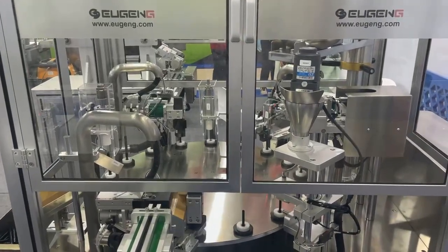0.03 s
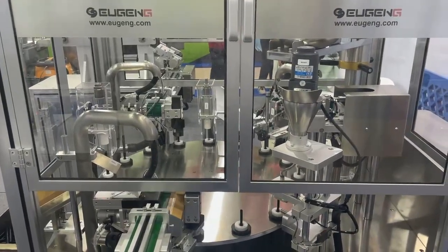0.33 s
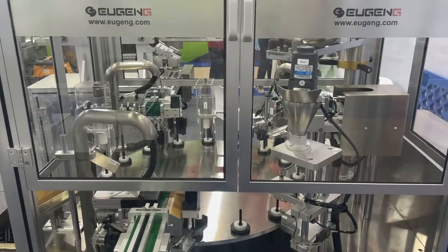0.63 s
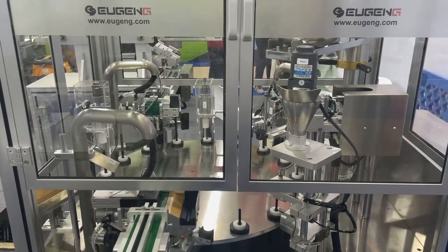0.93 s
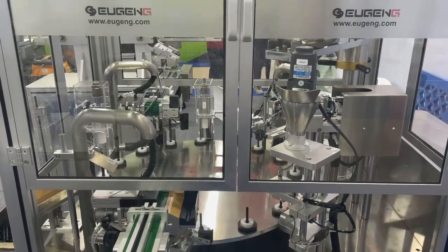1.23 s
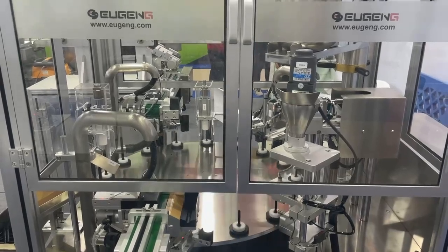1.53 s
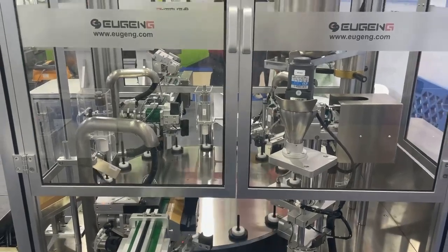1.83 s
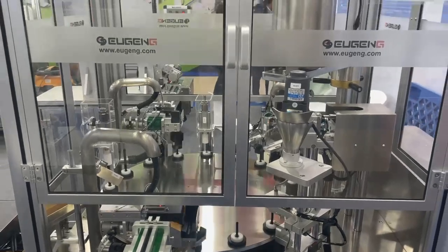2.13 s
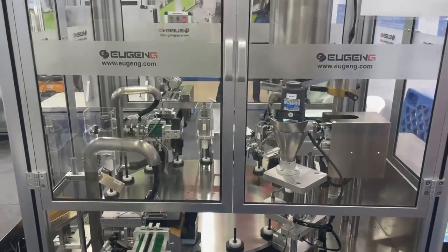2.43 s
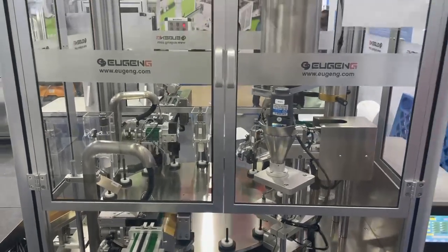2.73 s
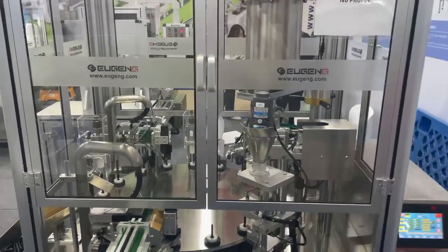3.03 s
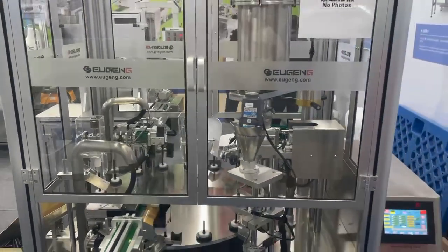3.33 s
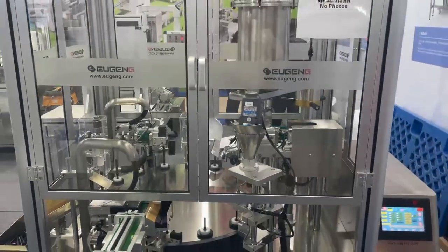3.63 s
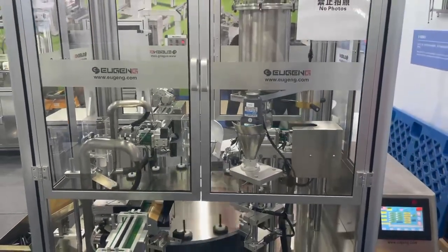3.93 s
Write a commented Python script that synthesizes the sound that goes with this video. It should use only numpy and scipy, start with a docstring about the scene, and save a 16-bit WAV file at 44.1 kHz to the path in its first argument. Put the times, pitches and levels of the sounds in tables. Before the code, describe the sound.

A filling machine runs in a large factory hall, its motors humming under irregular valve clicks, knocks and rattles. Midway, compressed air hisses and whistles briefly, then the knocking continues, with a steel ping near the end.

```python
"""Motors hum and beat over a large hall's steady roar and a faint air leak: a filling machine runs.
Pneumatic valves click and puff, slides knock against their stops, heavy strokes shake the frame,
steel parts clink and ping, loose parts rattle. The cabinet smears every blow into a short dense ring.
Midway a blast of compressed air hisses for half a second and whistles at the outlet's resonances."""
import sys
import numpy as np
from scipy import signal
from scipy.fft import rfft, irfft, next_fast_len
from scipy.io import wavfile
from scipy.ndimage import map_coordinates

SR = 44100
rng = np.random.default_rng(int(sys.argv[2]) if len(sys.argv) > 2 else 0)


def unload_audio(sound):
    """Save the sound as a 16-bit wav file, at the path given as the first command line argument."""
    columns = np.transpose(np.atleast_2d(sound))
    # keep every value between -1 and 1, then stretch to whole-number steps
    steps = np.round(np.clip(columns, -1, 1) * 32767)
    wavfile.write(sys.argv[1], SR, steps.astype(np.int16))


N = 176400

# Slide impacts. Each row: start in seconds, level in dB, t60 in seconds, tilt in dB per octave,
# note of the struck part in Hz, its level in dB.
SLIDE_HITS = [(.096, -19.5, .13, 2, 436, -20), (.235, -18.5, 0.17, -3, 810, -18),
              (.272, -16, 0.085, 1, 425, -14), (.279, -16, .1, -4.5, 350, -10.5),
              (0.283, -17, 0.11, -4, 223, -11.5), (.293, -19, .08, -3, 600, -16),
              (1.341, -19, .11, -6.5, 246, -13), (1.391, -18.5, 0.11, -1, 261, -16),
              (1.893, -15, 0.11, -2, 952, -8.5), (1.904, -18, .14, -3, 192, -9.5),
              (2.002, -15, 0.13, 1.5, 1604, -22.5), (2.226, -18.5, 0.079, 2, 407, -16),
              (2.284, -23, .08, -4, 417, -18), (2.784, -21, .05, 4, 1345, -19),
              (2.785, -22, 0.11, 2, 1920, -19), (2.803, -12, .09, -1, 499, -10.5),
              (2.824, -19.5, 0.15, -4, 307, -15), (3.01, -23.5, 0.23, 2.5, 706, -28),
              (3.284, -18, 0.055, 1, 665, -14)]
# Cabinet panels. Each row: frequency in Hz, relative density in dB.
PANEL_SPECTRUM = [(100, -39), (220, -2.5), (430, 4), (620, 1), (780, -5), (950, 2.5), (1150, -18),
                  (1500, -7.5), (2000, -11.5), (3000, -37), (8000, -67)]
# Valve clicks. Each row: start in seconds, level in dB, t60 in seconds, tilt in dB per octave.
VALVE_HITS = [(.095, -21, 0.074, -1.5), (.104, -27, .1, -2), (.293, -30, .055, 1), (.312, -31, .03, 10),
              (.792, -28.5, .044, 0), (.811, -28, .015, 7), (1.442, -18.5, 0.044, 0.5),
              (1.854, -23, 0.066, 9), (1.876, -20.5, 0.14, 12), (2.212, -25, 0.071, -6),
              (2.419, -24.5, 0.1, -8), (2.785, -21, 0.073, 1.5), (2.798, -24, .07, -2),
              (3.785, -31.5, .06, -1)]
# Metal contact noise. Each row: frequency in Hz, relative density in dB.
CONTACT_SPECTRUM = [(600, -25), (1400, 1), (2100, -8), (2800, 0), (3600, 3.5), (4600, -0.5), (5350, 7.5),
                    (6000, 2.5), (9300, -3), (12000, -14), (15500, -19)]
# Heavy strokes; clinks. Each row: start in seconds, level in dB.
FRAME_HITS = [(.885, -20), (1.44, -21), (1.858, -13.5), (3.47, -25), (3.91, -22.5)]
CLINK_HITS = [(1.057, -32.5), (1.068, -31.5), (1.103, -39)]
# Modes of valve body, frame, bright and dull steel parts.
# Each row: frequency in Hz, relative level in dB, t60 in seconds.
VALVE_MODES = [(1695, -4.5, 0.082), (2670, -6, 0.12), (4985, -8.5, 0.088), (5300, -6.5, 0.11),
               (6320, -10, 0.074)]
FRAME_MODES = [(57.8, 1, 0.24), (44, -12, .2), (170.5, -8.5, 0.18)]
PING_MODES = [(3960, -9.5, 0.076), (6270, -1.5, 0.13), (6375, -13, 0.48), (6386, -17, 0.38),
              (7600, -10, 0.068), (10760, -12, 0.13), (10900, -15, .04), (12900, -17, 0.065)]
CLINK_MODES = [(3900, -1, 0.085), (4000, -6, 0.082), (5044, 1, .2), (5800, -6, .1), (6270, -6, 0.092),
               (6540, -8, .17), (10800, -12, .1)]
# Outlet whistles. Each row: start and end in seconds, pitch and width in Hz, level in dB,
# pure-tone share of the power from 0 to 1.
OUTLET_WHISTLES = [(1.849, 1.87, 3380, 200, -23, 0.3), (1.885, 1.945, 2738, 44, -24.5, 0.4),
                   (1.948, 2.022, 2736, 48.2, -22.5, 0.5), (2.052, 2.125, 2736, 39, -25, 0.65),
                   (2.16, 2.235, 2742, 58, -28, .4), (2.26, 2.44, 2738, 79, -31.5, 0.34),
                   (1.89, 2.15, 2650, 89, -33, .1), (1.89, 2.24, 2985, 53, -33.5, .25),
                   (2.255, 2.31, 3000, 45, -26, 0.2), (2.33, 2.41, 3060, 68, -33, .2),
                   (1.93, 2.29, 4280, 130, -38.5, 0), (2.3, 2.425, 4230, 170, -32, 0.2),
                   (1.9, 1.975, 5938, 15, -34, 1)]
# Cylinder exhausts. Each row: start in seconds, length in seconds, level in dB.
VENTS = [(0.272, 0.033, -36), (0.377, 0.02, -31.5), (0.861, 0.048, -30), (1.262, .06, -30.5),
         (1.378, 0.035, -28), (2.206, 0.021, -27), (2.868, 0.022, -34), (3.372, 0.026, -33),
         (3.474, 0.031, -34.5), (3.867, 0.033, -32.5)]
# Noise of jet, exhaust, leak and hall. Each row: frequency in Hz, relative density in dB.
JET_SPECTRUM = [(500, -11), (1500, 0), (2300, 0.5), (3300, 5.5), (3800, 1.5), (4300, 3.5), (5000, 0.5),
                (6300, 0.5), (6800, 3), (8200, -7.5), (9100, -6.5), (9700, -6), (10100, -1.5), (10600, -6),
                (11200, -7), (11900, -4.5), (12300, -6.5), (12900, -19), (14000, -8), (16000, -23)]
PUFF_SPECTRUM = [(1000, -24), (2600, 5.5), (3300, 1.5), (4200, 4.5), (5200, -3.5), (6500, -2.5),
                 (10000, -12.5), (13000, -18), (16000, -29)]
LEAK_SPECTRUM = [(1500, -8), (3300, 0.5), (4600, -5), (5500, 3), (6500, -3.5), (7300, -6), (9000, -9.5),
                 (11500, -11.5), (13000, -17.5), (14300, -18), (16000, -15)]
ROAR_SPECTRUM = [(20, -16), (34, -18), (50, -0.5), (80, -1.5), (120, 5), (170, -4), (235, -1.5), (400, -4),
                 (680, -5), (950, -9), (1150, -12), (1500, -12), (2000, -18.5), (2750, -19), (4500, -26.5),
                 (9000, -41.5), (16000, -64)]
# Motor tones. Each row: frequency in Hz, base level in dB.
MOTOR_TONES = [(69.3, -39), (89.1, -36), (100.05, -26), (116.3, -31.5), (133.2, -37.5), (156, -45.5),
               (595, -44.5)]
# Envelopes of hum and leak. Each row: time in seconds, gain in dB.
HUM_ENVELOPE = [(0, -1), (.33, -3), (.45, -.5), (.9, 1), (1.3, 1), (1.9, 1), (2.1, -2), (2.35, 1),
                (2.6, -3), (3.0, -3), (3.35, 1), (4, 0)]
LEAK_ENVELOPE = [(0, -37.5), (.65, -39.5), (1.05, -37), (1.7, -37), (1.82, -33), (2.55, -38.5),
                 (2.74, -35.5), (3.0, -34.5), (3.12, -37.5), (4, -37.5)]
# Two microphone ports. Each row: frequency in Hz, left-right likeness (+ agrees, - opposes).
PORT_LIKENESS = [(50, 0.96), (125, 0.9), (250, 0.86), (500, 0.52), (1000, 0.18), (1700, 0.13), (2300, 0.53),
                 (2800, 0.71), (3400, 0.072), (4000, 0.49), (4700, 0.78), (5800, 0.14), (6400, 0.14),
                 (7000, -0.99), (8100, -1.2), (8900, -0.47), (9900, 0.95), (11600, .99), (12400, 0.88),
                 (13000, -0.76), (13500, -.995)]

BLAST_START_S, BLAST_END_S = 1.852, 2.43


def slide_knocks():
    """Slides hit their stops; the panels and the struck part ring."""
    out = np.zeros((2, N))
    for start_s, db, t60_s, tilt_db_oct, note_hz, note_db in SLIDE_HITS:
        panel = burst(PANEL_SPECTRUM, t60_s, attack_s=0.0013, tilt_db_oct=tilt_db_oct)
        add(out, start_s, amp(db) * panel)
        add(out, start_s, amp(note_db) * struck_part(note_hz))
    return out


def valve_clicks():
    """Each valve snaps and its body rings."""
    out = np.zeros((2, N))
    for start_s, db, t60_s, tilt_db_oct in VALVE_HITS:
        snap = burst(CONTACT_SPECTRUM, t60_s, attack_s=0.00078, tilt_db_oct=tilt_db_oct)
        add(out, start_s, amp(db) * snap)
        add(out, start_s, amp(db - 6) * ring(VALVE_MODES, attack_s=0.0014))
    return out * pan(4)


def frame_thumps():
    """Heavy strokes shake the frame's low modes."""
    out = np.zeros((2, N))
    for start_s, db in FRAME_HITS:
        add(out, start_s, amp(db) * ring(FRAME_MODES, attack_s=0.011))
    return out


def air_blast():
    """The jet surges, settles, sputters and swells again before the valve shuts."""
    surge_db = 11 * np.exp(-np.maximum(time_s() - BLAST_START_S, 0) / 0.1)
    swell_db = 3 * np.exp(-np.abs(time_s() - BLAST_END_S) / 0.078)
    sputter_db = 1.53 * wobble(60)
    opening = gate(BLAST_START_S, BLAST_END_S, attack_s=0.017, release_s=0.064)
    return amp(-28.8 + surge_db + swell_db + sputter_db) * opening * rush(JET_SPECTRUM) * pan(0.1)


def outlet_whistle():
    """A wandering edge tone in a narrow band of turbulence hops between outlet resonances."""
    out = np.zeros((2, N))
    for start_s, end_s, hz, width_hz, db, share in OUTLET_WHISTLES:
        pitch_hz = hz + 0.605 * width_hz * wobble(160)
        tone = stereo_sine(2 * np.pi * np.cumsum(pitch_hz) / SR, hz)
        turbulence = noise(lambda f: 1 / (1 + ((f - hz) / width_hz) ** 2))
        envelope = amp(db) * gate(start_s, end_s, attack_s=0.0085, release_s=0.019)
        out += envelope * (np.sqrt(share) * tone + np.sqrt(1 - share) * turbulence)
    flutter_db = 1.55 * wobble(150)
    return out * amp(flutter_db)


def steel_ping(start_s=3.657, db=-17.5):
    """A steel part is struck once; its close modes beat."""
    out = np.zeros((2, N))
    add(out, start_s, amp(db) * pan(-2) * ring(PING_MODES, attack_s=0.0014))
    snap = burst(CONTACT_SPECTRUM, t60_s=0.035, attack_s=0.0004, tilt_db_oct=3.5)
    add(out, start_s, amp(db - 5) * snap)
    return out


def steel_clinks():
    """A duller steel part rings over its contact noise."""
    out = np.zeros((2, N))
    for start_s, db in CLINK_HITS:
        add(out, start_s, amp(db) * ring(CLINK_MODES, attack_s=0.001))
        add(out, start_s, amp(db) * burst(CONTACT_SPECTRUM, t60_s=0.098, attack_s=0.0004))
    return out


def exhaust_puffs():
    """Cylinders vent briefly."""
    envelope = sum(amp(db) * gate(start_s, start_s + length_s, attack_s=0.0078, release_s=0.013)
                   for start_s, length_s, db in VENTS)
    return envelope * rush(PUFF_SPECTRUM)


def rattle(taps_per_s=12, db=-27.5, spread_db=2):
    """Loose parts tap faintly at random moments."""
    out = np.zeros((2, N))
    for when, size, pitch in rng.random((round(taps_per_s * N / SR), 3)):
        gain = amp(db + spread_db * (2 * size - 1))
        panel = burst(PANEL_SPECTRUM, t60_s=0.06, attack_s=0.00091, tilt_db_oct=1.5)
        add(out, when * N / SR, gain * panel)
        add(out, when * N / SR, gain * struck_part(hz=250 * 5 ** pitch))
    return out


def motor_hum(drift_rad=0.24):
    """Motors at close speeds beat against each other."""
    hum = np.zeros(N)
    for hz, db in MOTOR_TONES:
        phase_rad = 2 * np.pi * (hz * time_s() + rng.random()) + drift_rad * wobble(2.75)
        hum += np.sqrt(2) * amp(db) * np.sin(phase_rad)
    return hum * amp(at_times(HUM_ENVELOPE)) * pan(-1.5)


def hall_roar(db=-23.5, middle_hz=(250, 2500)):
    """The hall roars steadily; its middle range wavers slightly."""
    roar = rush(ROAR_SPECTRUM)
    middle = signal.sosfiltfilt(signal.butter(2, middle_hz, "band", fs=SR, output="sos"), roar)
    waver_db = wobble(35) + 0.7 * wobble(7.15)
    return amp(db) * ((roar - middle) * pan(-0.19) + middle * amp(waver_db) * pan(0.52))


def air_leak():
    """Air seeps from the pneumatic lines."""
    return amp(at_times(LEAK_ENVELOPE) + 0.75 * wobble(15)) * rush(LEAK_SPECTRUM)


def struck_part(hz):
    """One quickly damped mode."""
    return ring([(hz, 0, 0.059)], attack_s=0.0027)


def burst(spectrum, t60_s, attack_s, tilt_db_oct=0):
    """The dense, quickly dying ring of a blow inside the cabinet."""
    t = np.arange(SR // 4) / SR
    sound = noise(lambda hz: amp(at_hz(spectrum, hz) + tilt_db_oct * np.log2(hz + 1)), size=len(t))
    return sound * amp(-60 * t / t60_s) * (1 - np.exp(-t / attack_s))


def ring(modes, attack_s):
    """Damped modes with slight phase flutter."""
    t = np.arange(SR // 2) / SR
    tone = 0
    for hz, db, t60_s in modes:
        flutter_rad = 0.32 * map_coordinates(rng.standard_normal(400), [t * hz / 20], mode="wrap")
        tone += amp(db - 60 * t / t60_s) * stereo_sine(2 * np.pi * hz * t + flutter_rad, hz)
    return tone * (1 - np.exp(-t / attack_s))


def rush(spectrum):
    """Steady shaped noise."""
    return noise(lambda hz: amp(at_hz(spectrum, hz)))


def noise(gain_at_hz, size=N):
    """Shaped noise at the two ports, rms 1."""
    hz = np.fft.rfftfreq(size, 1 / SR)
    angle = port_angle_rad(hz)
    bins = rfft(rng.standard_normal((2, size))) * gain_at_hz(hz)
    mid, side = irfft(bins * np.array([np.cos(angle), np.sin(angle)]), size)
    stereo = np.array([mid + side, mid - side])
    return stereo / np.sqrt(np.mean(stereo ** 2) + 1e-20)


def stereo_sine(phase_rad, hz):
    """A tone at the two ports, rms 1."""
    return np.sqrt(2) * np.sin(phase_rad + port_angle_rad(hz) * np.array([[1], [-1]]))


def port_angle_rad(hz):
    """Half the phase angle between the ports."""
    return np.arccos(np.clip(at_hz(PORT_LIKENESS, hz), -0.995, 0.995)) / 2


def gate(start_s, end_s, attack_s, release_s):
    """A valve opens, holds and shuts."""
    t = time_s()
    return np.clip((t - start_s) / attack_s, 0, 1) * np.exp(-np.maximum(t - end_s, 0) / release_s)


def wobble(knots_per_s):
    """A smooth random curve."""
    return map_coordinates(rng.standard_normal(1200), [time_s() * knots_per_s], mode="wrap")


def at_hz(points, hz):
    knots_hz, values = np.transpose(points)
    return np.interp(np.log(hz + 1), np.log(knots_hz + 1), values)


def at_times(points):
    return np.interp(time_s(), *np.transpose(points))


def add(out, start_s, sound):
    part = out[:, round(start_s * SR):][:, :sound.shape[1]]
    part += sound[:, :part.shape[1]]


def pan(left_db):
    return amp(left_db * np.array([[0.5], [-0.5]]))


def amp(db):
    return 10 ** (np.asarray(db) / 20)


def time_s():
    return np.arange(N) / SR


def scene():
    """The machine in its hall; the air lines lie slightly left."""
    background = motor_hum() + hall_roar()
    air = (air_leak() + exhaust_puffs()) * pan(0.21) + air_blast() + outlet_whistle()
    blows = valve_clicks() + slide_knocks() + frame_thumps() + steel_ping() + steel_clinks() + rattle()
    return blows + air + background


def record(dry, top_hz=15800):
    """Brick-wall low-pass."""
    size = next_fast_len(N + SR // 4)
    passband = np.fft.rfftfreq(size, 1 / SR) < top_hz
    return irfft(rfft(dry, size) * passband, size)[:, :N]


dry = scene()
out = record(dry)
unload_audio(out)
```